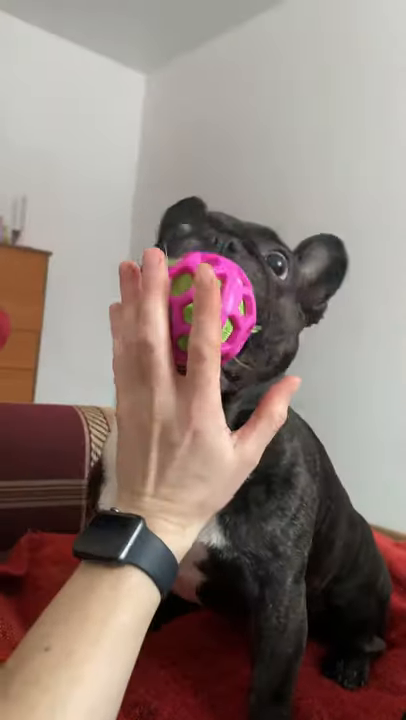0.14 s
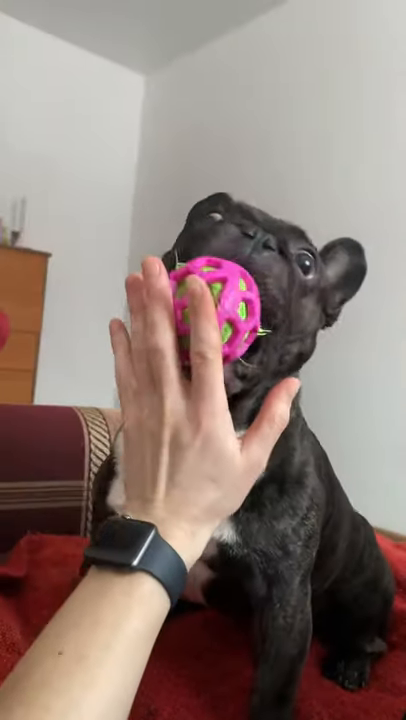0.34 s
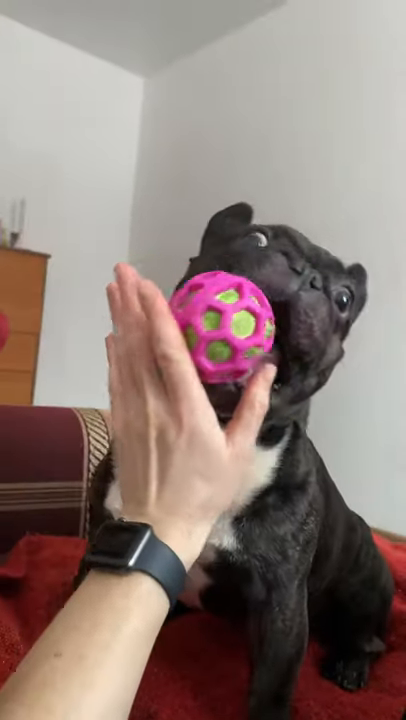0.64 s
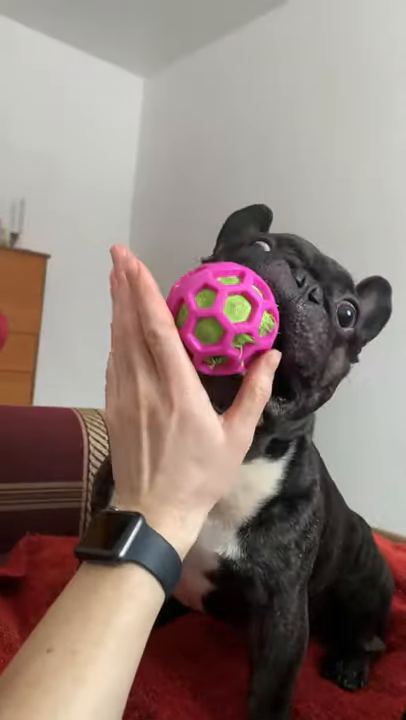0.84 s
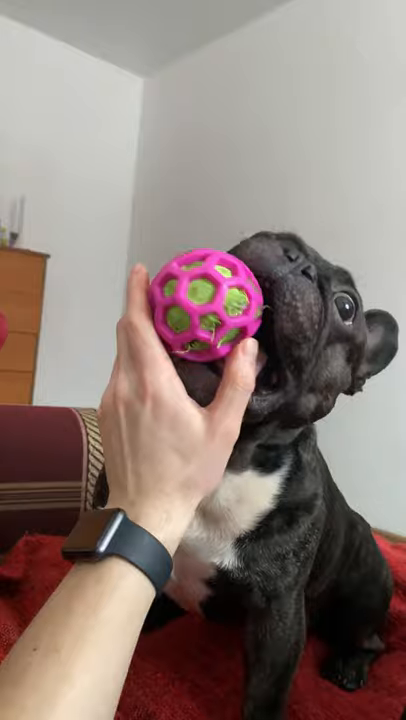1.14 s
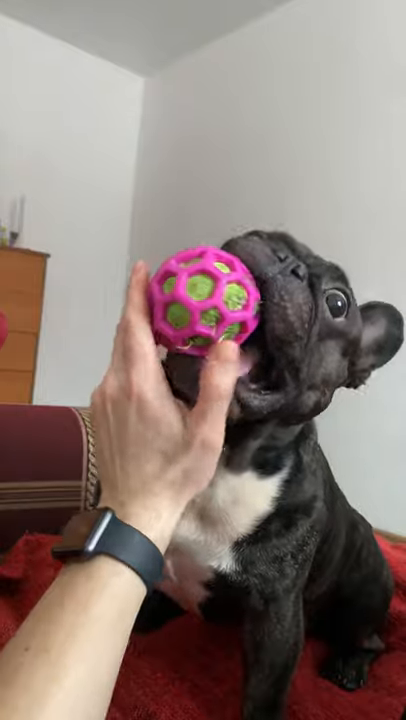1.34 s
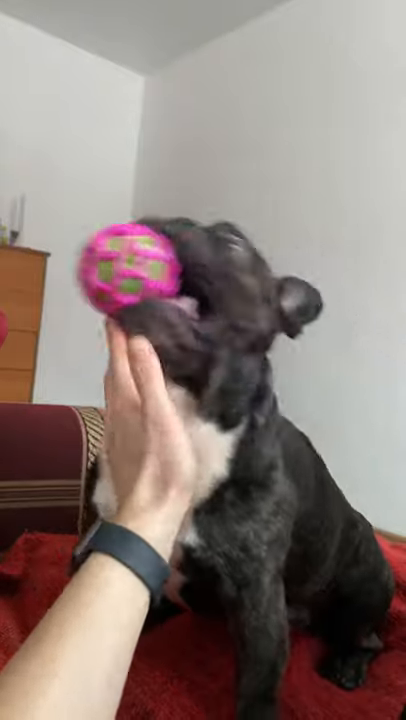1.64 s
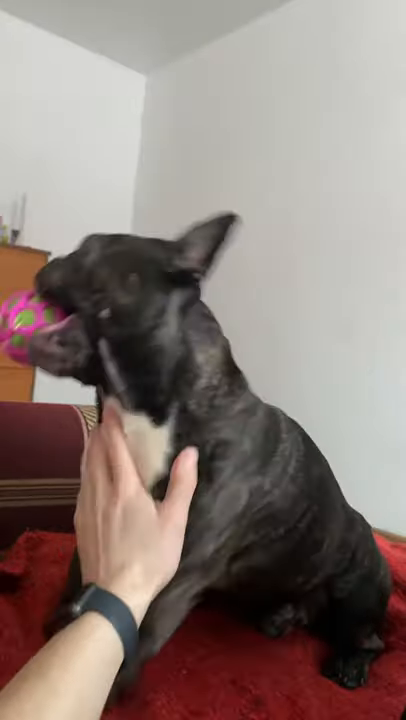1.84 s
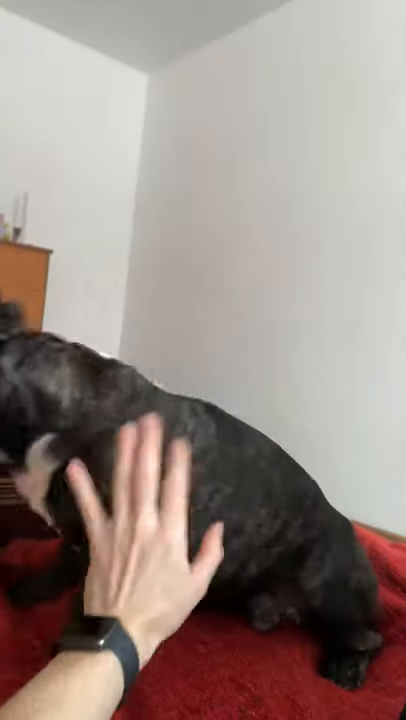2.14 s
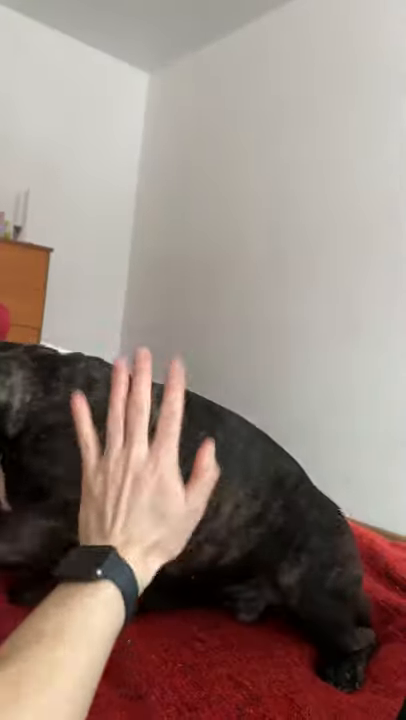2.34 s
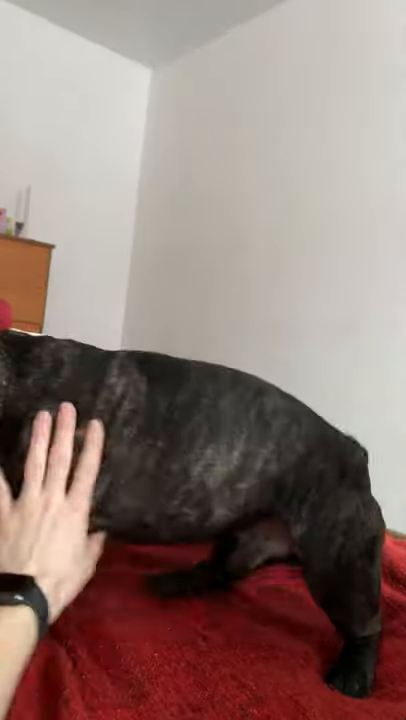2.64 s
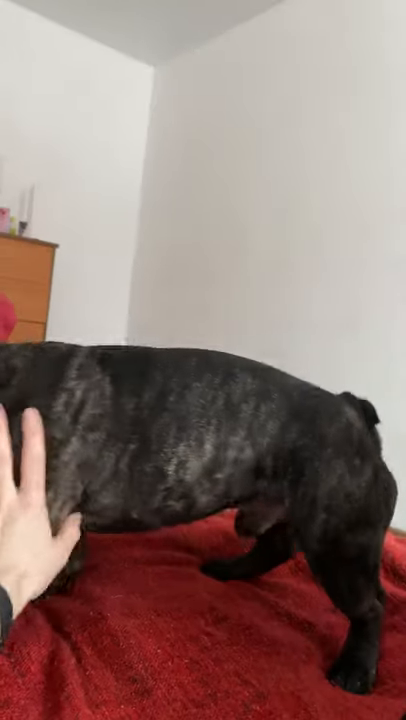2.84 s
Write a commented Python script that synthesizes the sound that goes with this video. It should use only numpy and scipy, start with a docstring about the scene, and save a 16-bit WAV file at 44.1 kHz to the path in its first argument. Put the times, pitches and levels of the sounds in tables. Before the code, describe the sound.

A small dog mouths a rubber ball close by: wet clicks, a squeaky rubber bite and thump, a popping snort, a quiet pause, then a low rattling growl and a nasal grunt in a small room.

```python
"""Wet clicks of the mouth on a rubber ball: a small flat-faced dog mouths it on a sofa in a small room.
It bites, snorts with popping, grumbles, then gives a low rattling growl and a second grunt through the nose.
Clicks, pops, ball, thumps and knocks are damped sines; clicks, pops and bites add bursts of noise. The growl
is uneven pulses through resonances, with gated noise for its rasp; the nose is coloured and resonant noise.
A short diffuse tail and a quiet noise floor lie behind."""
import sys
import numpy as np
from scipy import signal
from scipy.fft import rfft, irfft
from scipy.io import wavfile
from scipy.ndimage import uniform_filter1d

SR = 44100
rng = np.random.default_rng(int(sys.argv[2]) if len(sys.argv) > 2 else 0)


def digitize_waveform(pressure):
    """Quantize a signal to 16-bit integers and store it at the path in sys.argv[1].

    Rows of a 2-D input are taken as channels; values are limited to [-1, 1].
    """
    field = np.atleast_2d(pressure).T
    bounded = np.clip(field, -1, 1)
    quanta = np.round(bounded * 32767).astype(np.int16)
    wavfile.write(sys.argv[1], SR, quanta)


N = 132300
T = np.arange(N) / SR
HZ = np.maximum(np.arange(N + 1) * SR / (2 * N), 1)
MID_SIDE = np.array([[1], [-1]])  # sign of the side signal, left and right

# air of the snort: [t/s, level/dB]
SNORT = [(0.3, -53), (0.34, -51.5), (0.42, -73), (0.48, -71), (0.55, -68), (0.62, -66), (0.645, -46.5),
         (0.68, -39), (0.72, -48.5), (0.79, -46.5), (0.86, -50), (0.9, -74), (0.96, -85), (1.15, -80),
         (1.22, -66.5), (1.31, -82.5), (1.4, -84.5)]


def from_db(db):
    """Decibels to gain."""
    return 10 ** (np.asarray(db) / 20)


def rms_one(x):
    """Scale to unit rms."""
    return x / np.sqrt(np.mean(x ** 2) + 1e-20)


def in_time(rows):
    """Each column of a curve, interpolated at every sample."""
    s, *columns = np.transpose(rows)
    return [np.interp(T, s, c) for c in columns]


def fader(rows, column=0):
    """Gain from a dB curve, silent outside it, with smoothed ends."""
    inside = 1. * (T >= rows[0][0]) * (T <= rows[-1][0])
    return from_db(in_time(rows)[column]) * uniform_filter1d(inside, size=400)


def at_hz(points):
    """A spectrum at every frequency, interpolated over log frequency."""
    hz, value = np.transpose(points)
    return np.interp(np.log(HZ), np.log(hz), value)


def filtered(x, response):
    """Apply a frequency response, zero-padded."""
    return irfft(rfft(x, 2 * N) * response)[..., :N]


def noise(colour, spread=0):
    """Stereo noise of a given colour; spread sets how much the sides differ."""
    mid, side = filtered(rng.standard_normal((2, N)), from_db(at_hz(colour)))
    return rms_one(mid + spread * side * MID_SIDE)


def edge(x, hz, kind, order=2):
    """Butterworth low- or high-pass."""
    return signal.sosfilt(signal.butter(order, hz, kind, fs=SR, output="sos"), x + 1e-18)


def resonate(x, table):
    """Parallel two-pole resonances with alternating signs."""
    out = 0
    for k, (hz, width_hz, db) in enumerate(table):
        r = np.exp(-np.pi * width_hz / SR)
        poles = [1, -2 * r * np.cos(2 * np.pi * hz / SR), r * r]
        gain = (-1) ** k * from_db(db) * (1 - r * r) / 2
        out = out + gain * signal.lfilter([1, 0, -1], poles, x + 1e-18)
    return out


def ring(s, hz, t60, attack):
    """A struck mode from time s: an exponentially damped sine with a soft onset."""
    out, start = np.zeros(N), int(s * SR)
    t = T[:min(N - start, int(2 * t60 * SR))]
    envelope = np.exp(-np.log(1000) * t / t60) * (1 - np.exp(-t / attack))
    out[start:start + len(t)] = np.sin(2 * np.pi * hz * t) * envelope
    return out


def burst(s, decay_s):
    """A sudden envelope that decays exponentially."""
    return (T >= s) * np.exp(-np.clip((T - s) / decay_s, 0, 40))


def even(x):
    """Hold the level steady over a few cycles."""
    power = uniform_filter1d(uniform_filter1d(x ** 2, size=1400), size=1000)
    return x / np.sqrt(power + 1e-12)


def chewing():
    """Wet clicks and snort pops ring briefly, slipping teeth ring the ball; all spray a short crackle."""
    # wet clicks of the mouth, and pops in the snort:
    # [t/s, pop level/dB, pop f/Hz, crackle level/dB, sizzle level/dB, spray decay/s]
    clicks = [(0.054, -25, 1520, -41, -42, 0.0011), (0.0575, -28.5, 1480, -38.5, -49, 0.0012),
              (0.1475, -40.5, 1574, -45, -47, 0.0024), (0.242, -42, 2190, -57.5, -76, 0.0015),
              (0.2837, -46.5, 1700, -47, -55, 0.0021), (0.305, -35, 1320, -46, -51, .004),
              (0.4575, -24, 2400, -32.5, -41.5, 0.0027), (0.494, -39, 1610, -34, -48, 0.0012),
              (0.4962, -18, 1530, -29.5, -41, 0.0011), (0.561, -77, 2000, -47, -48, 0.0055),
              (0.5697, -61, 1960, -46, -35.5, .0015), (0.6066, -52, 1500, -43.5, -34, 0.0034),
              (0.641, -15, 1517, -26, -47, 0.0018), (0.6662, -23, 1640, -34, -50, .0012),
              (0.721, -19.5, 1415, -49, -60, .001), (0.738, -32.5, 1410, -29.5, -48, 0.00097),
              (0.7472, -30.5, 1290, -56, -58, 0.00083), (0.776, -21.5, 1620, -56, -60, .001),
              (0.8008, -22.5, 1500, -36, -58, 0.00084), (0.82, -49, 1630, -47, -60, .001),
              (0.989, -47, 2400, -53.5, -83, 0.0038), (1.285, -64.5, 1968, -46.5, -40.5, 0.00058),
              (1.658, -56.5, 2220, -42.5, -72, 0.0014), (1.941, -36.5, 1070, -55.5, -76, .002),
              (1.958, -42, 2560, -47, -65, 0.0023), (1.985, -40, 1110, -50, -54, .002),
              (2.199, -32, 1480, -47, -65, .002), (2.212, -27.5, 1900, -46.5, -55.5, 0.0098),
              (2.25, -39, 1860, -47, -55, 0.0022), (2.256, -30, 1430, -57, -63, 0.00088),
              (2.2821, -22, 1770, -31, -48, .002), (2.2985, -24.5, 1150, -42, -57, 0.0013),
              (2.466, -36.5, 1080, -51.5, -45.5, 0.0037), (2.5147, -34.5, 2230, -30, -43, 0.0014),
              (2.5695, -31.5, 1300, -34.5, -55, 0.0025), (2.63, -25.5, 980, -57, -69, .001),
              (2.644, -27.5, 1000, -62, -68, .001), (2.672, -32, 1070, -50, -64, .001)]
    # teeth slip on rubber that tightens when squeezed: [t/s, level/dB, f/ball mode f]
    bites = [(0.328, -25.5, 0.92), (0.3296, -15, 1.038), (0.3324, -22.5, 1.03), (0.335, -24.5, 0.91),
             (0.3606, -25, 0.98), (0.3672, -32, 1.22), (0.368, -30.5, 0.98)]
    # ball modes: [f/Hz, level/dB, t60/s]
    ball = [(596, -9, 0.021), (857, -18.5, .03), (1412, -2, .024), (1903, 3, 0.019), (2330, 1, 0.0037),
            (3130, -5.5, 0.0094), (3580, -18.5, .016), (4270, -24.5, .01), (5437, -12.5, 0.042),
            (5850, -17.5, .011)]
    # spray spectra: [f/Hz, level/dB]
    crackle_colour = [(500, -24), (900, -17.5), (1500, 5), (2300, 1.5), (2900, -2), (4000, -1.5),
                      (5600, -4), (7200, -10), (10000, -21.5)]
    sizzle_colour = [(4000, -32), (7300, -16.5), (9000, -3.5), (11500, -6.5), (13500, -17.5),
                     (15500, -15.5), (17000, -19.5)]
    pop_t60_s, attack_s, pop_low_hz = 0.0081, 0.00033, 980
    slip_s, slip_crackle_db, slip_sizzle_db = 0.0029, -9.5, -17

    pops, rubber, crackle, sizzle = 0, 0, 0, 0
    for s, pop_db, hz, crackle_db, sizzle_db, decay_s in clicks:
        pops = pops + from_db(pop_db) * ring(s, hz, pop_t60_s, attack_s)
        spray = burst(s, decay_s)
        crackle = crackle + from_db(crackle_db) * spray
        sizzle = sizzle + from_db(sizzle_db) * spray
    for s, db, tight in bites:
        for hz, mode_db, t60 in ball:
            gain = from_db(db + mode_db + rng.normal(0, 1.0))
            rubber = rubber + gain * ring(s, hz * tight, t60, attack_s)
        spray = from_db(db) * burst(s, slip_s)
        crackle = crackle + from_db(slip_crackle_db) * spray
        sizzle = sizzle + from_db(slip_sizzle_db) * spray
    sizzle = edge(sizzle, 180, "low", order=1)  # the finest spray swells a little later
    sprays = crackle * noise(crackle_colour, spread=0.91) + sizzle * noise(sizzle_colour, spread=.6)
    return edge(pops, pop_low_hz, "high", order=3) + rubber + sprays


def bumps():
    """Booming thumps, shorter hollow knocks and the low part of the snort's pops: damped modes."""
    # thumps of body and ball: [t/s, level/dB, f/Hz, t60/s]
    thump_rows = [(0.198, -27.5, 112, 0.13), (0.337, -17, 100, 0.31), (0.531, -35.5, 99, 0.37),
                  (0.617, -33.5, 98.4, 0.28), (0.726, -29, 108.2, 0.276), (1.584, -35.5, 104, 0.248),
                  (1.752, -31.5, 80, 0.2), (2.216, -21, 101, 0.27), (2.2343, -23.5, 102, 0.148),
                  (2.545, -30, 111.4, 0.35), (2.672, -29.5, 111.2, 0.49)]
    # knocks of jaw and ball, and the low part of the snort's pops: [t/s, level/dB, f/Hz]
    knock_rows = [(0.191, -48, 520), (0.288, -40, 340.4), (0.307, -32.5, 444), (0.332, -17.5, 664),
                  (0.364, -25.5, 290.4), (0.385, -25.5, 369), (0.42, -30, 406), (0.46, -25, 332.4),
                  (0.516, -28, 411), (0.536, -34.5, 390), (0.572, -31, 352.5), (0.612, -33, 363),
                  (0.636, -27.5, 405), (0.686, -31, 514), (0.7235, -27.5, 476), (0.748, -33, 448),
                  (0.777, -35, 526), (0.802, -33.5, 532), (1.195, -46.5, 392), (2.602, -39, 336),
                  (2.683, -29.5, 242)]
    # partials of each: [ratio to f, level/dB]
    thump_modes = [(1, -0.5), (.66, -9.5), (1.3, -13), (2.2, -18.5)]
    knock_modes = [(1, 6), (.68, -3), (1.2, -6)]
    thump_attack_s, knock_attack_s, knock_t60_s = 0.0043, .0015, 0.025

    out = 0
    for s, db, hz, t60 in thump_rows:
        for ratio, part_db in thump_modes:
            out = out + from_db(db + part_db) * ring(s, hz * ratio, t60, thump_attack_s)
    for s, db, hz in knock_rows:
        for ratio, part_db in knock_modes:
            out = out + from_db(db + part_db) * ring(s, hz * ratio, knock_t60_s, knock_attack_s)
    return edge(out, 50, "high", order=4)


def growl():
    """Slow uneven pulses ring chest and throat; each lets through a spurt of rasping air."""
    # pulse rate: [t/s, f/Hz]
    pitch = [(1.91, 76), (1.95, 72), (1.98, 66), (2.0, 59), (2.04, 64), (2.09, 67), (2.12, 70), (2.15, 79),
             (2.2, 80), (2.26, 66), (2.32, 68), (2.42, 64), (2.55, 72), (2.63, 62), (2.70, 56), (2.85, 55)]
    # pulse timing jitter: [t/s, deviation/cycle]
    roughness = [(1.92, .02), (2.04, .02), (2.09, .05), (2.14, .02), (2.19, .03), (2.23, .14), (2.33, .09),
                 (2.55, .15), (2.8, .1)]
    # loudness: [t/s, chest level/dB, throat level/dB, rasp level/dB]
    loudness = [(1.89, -60, -62, -92), (1.92, -48, -53, -59.5), (1.936, -38, -42, -67.5),
                (1.972, -30, -35.5, -46.5), (2.038, -34, -39.5, -55.5), (2.094, -38.5, -50.5, -63.5),
                (2.204, -36, -39, -58.5), (2.242, -36.5, -41.5, -56), (2.306, -30, -35.5, -54),
                (2.368, -42.5, -56, -66), (2.44, -49.5, -58, -86), (2.492, -55, -64, -61),
                (2.536, -34, -46.5, -74), (2.606, -38, -51.5, -65), (2.696, -36, -46, -77),
                (2.736, -49, -60.5, -71), (2.952, -67, -71.5, -94), (3.0, -79, -82, -100)]
    # resonances of chest, throat and rasping air: [f/Hz, width/Hz, level/dB]
    chest_ring = [(113, 90, 0.5), (204, 184, -12)]
    throat_ring = [(260, 165, -6), (370, 86, 1.5), (470.4, 45, -3)]
    rasp_ring = [(1020, 190, -2.5), (1797, 75, -2), (2376, 105, -4.5), (3324, 120, 0.5), (4370, 320, -15)]
    # lips lift, the rasp opens into a snarl: [t/s, level/dB], [f/Hz, width/Hz, level/dB]
    snarl_level = [(2.185, -61), (2.21, -43.5), (2.235, -48), (2.26, -42), (2.275, -56), (2.3, -44.5),
                   (2.325, -54), (2.36, -70)]
    snarl_ring = [(744, 220, -3.5), (1140, 240, -3), (1530, 180, -8), (1870, 330, -8.5), (2420, 260, 3.5)]
    # open jaw, higher throat resonance: [t/s, level/dB], [f/Hz, width/Hz, level/dB]
    jaw_level = [(1.91, -64), (1.95, -50.5), (1.99, -46), (2.04, -52), (2.08, -64), (2.2, -57), (2.27, -59),
                 (2.3, -38.5), (2.34, -76), (2.51, -72), (2.56, -50.5), (2.6, -56), (2.7, -58), (2.76, -75)]
    jaw_ring = [(523, 69, 0.5), (587, 77, -6.5)]
    shimmer_db, rough_shimmer_db = 1.4, 7  # pulse strength deviation: base, and per cycle of jitter
    gate_decay_s, gate_leak = .004, .15  # spurt of air; constant leak between pulses
    chest_db, throat_db, rasp_db = -0.5, 0, 1

    (hz,), (rough,) = in_time(pitch), in_time(roughness)
    cycles = np.cumsum(hz * (T >= pitch[0][0])) / SR
    at = np.flatnonzero(np.diff(np.floor(cycles + .5)))
    chance = rng.standard_normal((len(at), 3))
    jittered = at + chance[:, 0] * rough[at] * SR / hz[at]
    strength_db = chance[:, 1:].T * (shimmer_db + rough_shimmer_db * rough[at])
    pulses = np.zeros((2, N))
    pulses[:, np.clip(jittered, 0, N - 1).astype(int)] = from_db(strength_db)
    chest_pulses, throat_pulses = pulses

    chest = edge(resonate(chest_pulses, chest_ring), 58, "high", order=4)
    chest = even(edge(chest, 257, "low"))
    throat = edge(resonate(throat_pulses, throat_ring), 206, "high")
    throat = even(edge(throat, 522, "low", order=6))
    jaw = edge(resonate(throat_pulses, jaw_ring), 420, "high")
    jaw = even(edge(jaw, 747, "low", order=6))

    gate = signal.lfilter([1], [1, -np.exp(-1 / (gate_decay_s * SR))], throat_pulses) + gate_leak
    air = gate * rng.standard_normal(N)
    rasp = even(edge(resonate(air, rasp_ring), 5500, "low", order=4))
    snarl = even(edge(resonate(air, snarl_ring), 2180, "low", order=6))

    out = fader(snarl_level) * snarl + fader(jaw_level) * jaw
    for k, (db, x) in enumerate([(chest_db, chest), (throat_db, throat), (rasp_db, rasp)]):
        out = out + from_db(db) * fader(loudness, column=k) * x
    return out


def grumble():
    """Irregular soft flaps deep in the throat: random impulses through low resonances."""
    # loudness: [t/s, level/dB]
    loudness = [(0.17, -65), (0.22, -45), (0.30, -42), (0.36, -33), (0.44, -39.5), (0.49, -40),
                (0.55, -43.5), (0.6, -45.5), (0.63, -36), (0.78, -43.5), (0.87, -48), (0.97, -61.5),
                (1.15, -71), (1.22, -62.5), (1.32, -63.5), (1.38, -85), (1.56, -70), (1.66, -53),
                (1.88, -52), (1.95, -40.5)]
    # throat: [f/Hz, width/Hz, level/dB]
    throat_ring = [(104.8, 16, -2.5), (66.6, 42, -12.5), (151.2, 34, -11), (260, 70, -19.5),
                   (396.7, 120, -22)]
    flaps_per_s = 170

    flaps = 1. * (rng.random(N) < flaps_per_s / SR)
    rung = edge(resonate(flaps, throat_ring), 52, "high", order=4)
    return fader(loudness) * even(edge(rung, 600, "low", order=4))


def nose():
    """Air hisses and whistles through narrow nostrils that flutter: shaped noise."""
    # breath through growl and second grunt: [t/s, level/dB]
    breath = [(1.48, -84), (1.6, -74.5), (1.67, -58), (1.75, -65), (1.9, -64.5), (1.98, -58.5), (2.12, -69),
              (2.19, -63), (2.22, -64), (2.31, -54.5), (2.37, -71), (2.458, -62), (2.465, -51), (2.53, -51),
              (2.565, -54.5), (2.61, -52.5), (2.7, -57.5), (2.78, -53), (2.87, -60), (3.0, -67.5)]
    # spectra of snort and later breath: [f/Hz, level/dB]
    snort_colour = [(180, -33), (300, -7), (603, -4), (1080, -15.5), (1530, -15), (2610, -18), (5520, -19),
                    (6520, -26), (7440, -51), (8090, -23.5), (8640, -12.5), (12300, -23), (13500, -54.5),
                    (14700, -19), (16000, -34)]
    breath_colour = [(290, -2), (500, -6.5), (807, -14), (1060, -12), (1870, -16), (2650, -16.5),
                     (3150, -22), (4530, -18), (4940, -17.5), (6510, -19.5), (7310, -56), (7980, -19),
                     (9360, -17.5), (12000, -22.5), (13300, -53), (15100, -20), (16000, -43)]
    # faint whistle in the second grunt: [t/s, level/dB], [f/Hz, width/Hz, level/dB]
    whistle_level = [(2.46, -59.5), (2.52, -65.5), (2.555, -48), (2.575, -50), (2.6, -56.5), (2.65, -64)]
    whistle_ring = [(1430, 64, -0.5), (2260, 110, -6), (2652, 47, -1.5), (4140, 160, -1), (4440, 62, -3),
                    (4670, 100, -5)]
    # soft sniffs: [t/s, length/s, level/dB, f/Hz]
    sniff_rows = [(0.907, 0.29, -77.5, 1620), (1.175, 0.21, -80, 3560), (1.194, 0.26, -83, 5500),
                  (1.519, .07, -68.5, 1300), (1.744, 0.17, -61.5, 750), (2.61, 0.11, -56.5, 845)]
    flutter_db, flutter_top_hz, spread, sniff_width_hz = 2, 69, 0.61, 245

    wobble = rms_one(edge(rng.standard_normal(N), flutter_top_hz, "low"))
    flutter = from_db(flutter_db * wobble)
    air = rng.standard_normal(N)
    whistle = fader(whistle_level) * rms_one(resonate(air, whistle_ring))
    sniffs = 0
    for s, length_s, db, hz in sniff_rows:
        swell = np.sin(np.pi * np.clip((T - s) / length_s, 0, 1))
        sniffs = sniffs + from_db(db) * swell * rms_one(resonate(air, [(hz, sniff_width_hz, 0)]))
    hiss = fader(SNORT) * noise(snort_colour, spread) + fader(breath) * noise(breath_colour, spread)
    return flutter * (hiss + whistle + sniffs)


def spit():
    """Tiny saliva bubbles burst in the snorted air: random impulses through resonances."""
    # bubbles: [f/Hz, width/Hz, level/dB]
    bubble_ring = [(850, 300, -6.5), (1490, 800, 0.5), (1900, 220, -4), (4200, 300, -9)]
    bursts_per_s, spread_db, against_air_db = 100, 7.5, -5.5

    strength = from_db(spread_db * np.clip(rng.standard_normal(N), -2, 2))
    bursts = (rng.random(N) < bursts_per_s / SR) * strength
    return from_db(against_air_db) * fader(SNORT) * rms_one(resonate(bursts, bubble_ring))


def ports(x):
    """Two microphone ports: level difference by frequency, and a small lead on the left."""
    # left against right: [f/Hz, level/dB]
    left_louder = [(100, 0), (300, -0.5), (700, 2.5), (1500, 3.5), (3000, -0.5), (5500, -1.4), (12000, 0.5)]
    left_lead_s = .000033

    sides = np.array([[.5], [-.5]])
    delay = np.exp(2j * np.pi * HZ * sides * left_lead_s)
    return filtered(x, from_db(sides * at_hz(left_louder)) * delay)


def room(x):
    """A short diffuse tail of decaying noise, its bass nearly alike on both sides."""
    # reverberation against direct sound: [f/Hz, level/dB]
    tail_level = [(60, -30.5), (200, -15.5), (500, -4.5), (1500, -12), (4000, -8.5), (9000, -10.5),
                  (16000, -24.5)]
    # side against mid: [f/Hz, level/dB]
    width = [(60, -31.5), (200, -12), (500, -2), (1200, 4)]
    bass_t60_s, treble_t60_s, split_hz = 0.4, 0.41, 3000

    white = rng.standard_normal((2, N)) * (T > .004)
    bass = edge(white, split_hz, "low") * from_db(-60 * T / bass_t60_s)
    treble = edge(white, split_hz, "high") * from_db(-60 * T / treble_t60_s)
    tail = rms_one(bass - treble) / np.sqrt(2 * N)
    mid, side = rfft(tail, 2 * N) * from_db(at_hz(tail_level))
    return filtered(x, mid + side * from_db(at_hz(width)) * MID_SIDE)


def floor():
    """Steady quiet background: coloured noise."""
    # spectrum: [f/Hz, level/dB]
    colour = [(15, -35.5), (25, -7.5), (64, -2.5), (195, -9), (249, -22.5), (405, -17.5), (545, -30.5),
              (1890, -29), (2350, -35.5), (3520, -36), (4740, -42), (6560, -46.5), (7510, -50.5),
              (10100, -39.5), (16000, -51.5)]
    return from_db(-68) * noise(colour, spread=0.9)


def scene():
    """The dog at the two microphone ports, with the room and its quiet floor."""
    dog = chewing() + bumps() + growl() + grumble() + nose() + spit()
    return ports(dog) + room(dog.mean(axis=0)) + floor()


def record(dry):
    """The microphone has a narrow dip in the treble; an elliptic low-pass cuts the top."""
    cutoff_hz = 16400
    dipped = signal.lfilter(*signal.iirnotch(7450, 6, fs=SR), dry)
    return signal.sosfilt(signal.ellip(10, .2, 80, cutoff_hz, fs=SR, output="sos"), dipped)


dry = scene()
out = record(dry)
digitize_waveform(out)
```